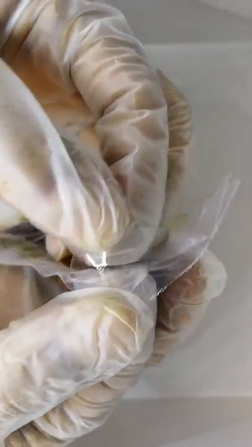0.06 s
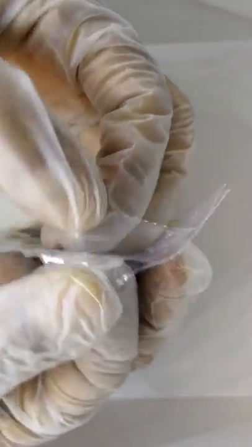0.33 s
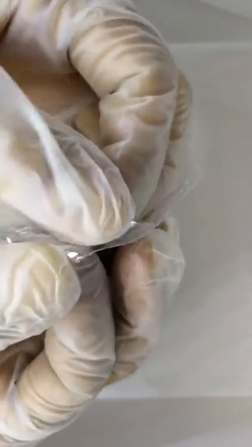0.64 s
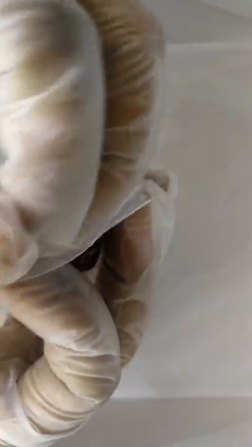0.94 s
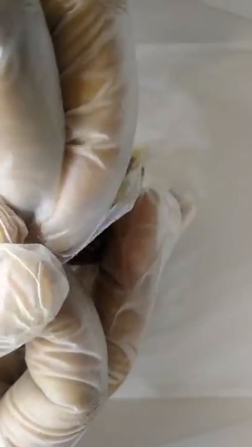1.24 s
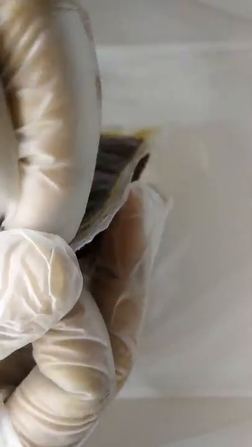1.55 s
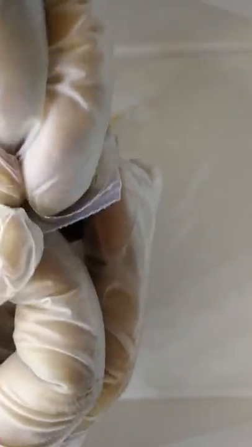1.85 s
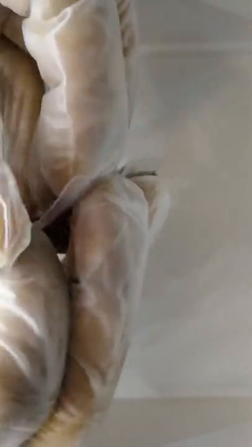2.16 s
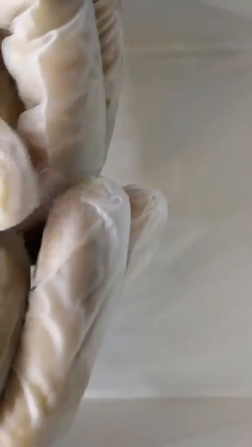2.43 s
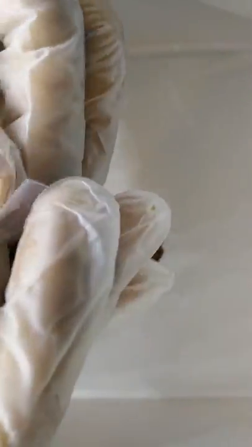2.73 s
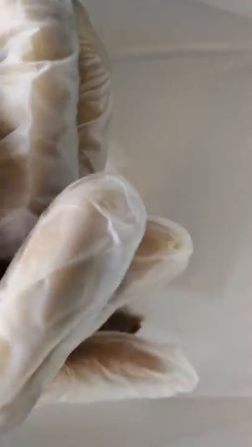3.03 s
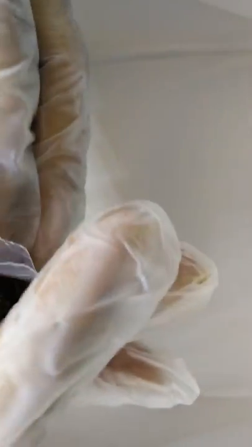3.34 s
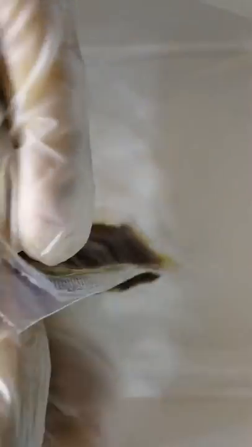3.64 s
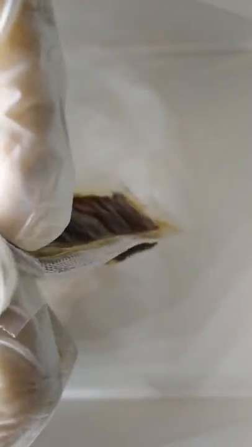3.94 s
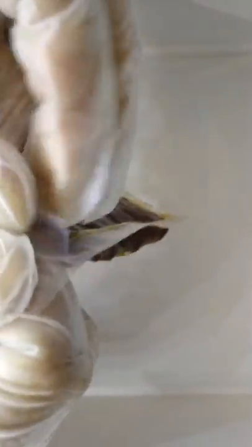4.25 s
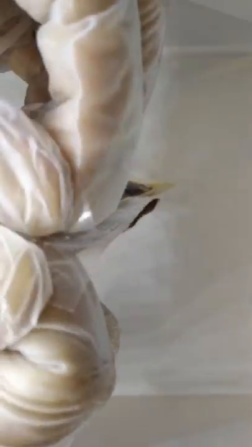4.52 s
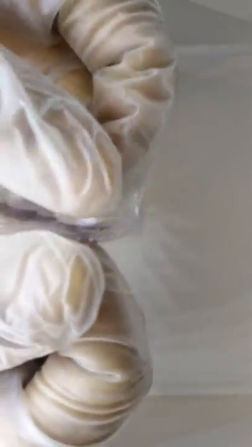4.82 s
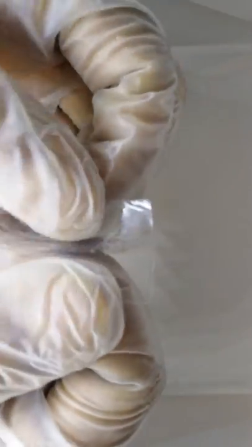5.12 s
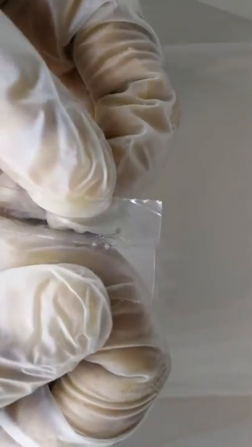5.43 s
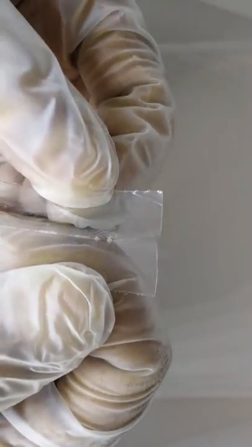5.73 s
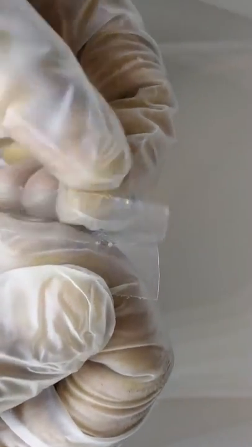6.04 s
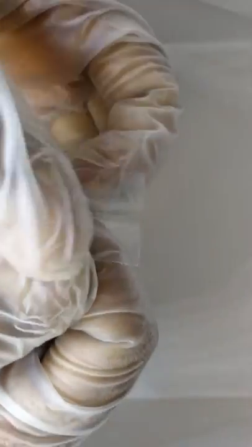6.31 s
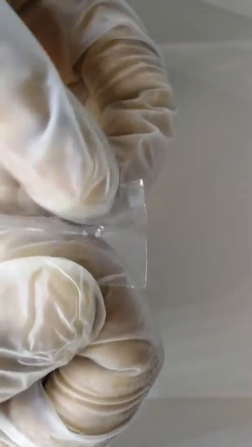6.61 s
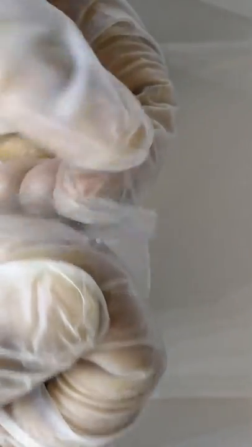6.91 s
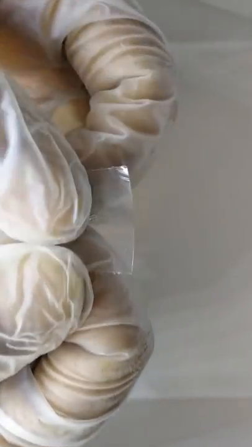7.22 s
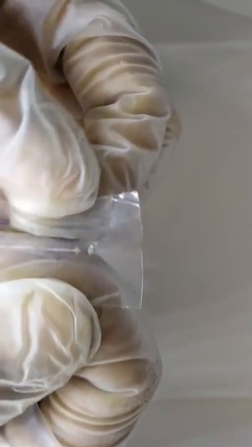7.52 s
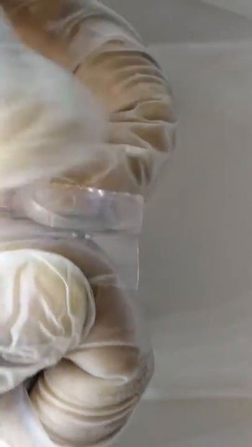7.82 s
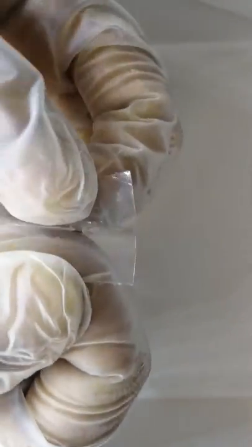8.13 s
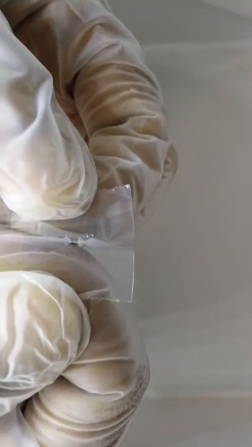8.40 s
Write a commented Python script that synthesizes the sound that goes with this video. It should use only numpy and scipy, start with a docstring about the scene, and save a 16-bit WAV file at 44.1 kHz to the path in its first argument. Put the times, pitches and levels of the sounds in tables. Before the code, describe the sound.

Gloved fingers work a small pack of thin plastic film, close to the microphone and mostly on the left. Two sharp snaps stand out at about 0.1 and 0.7 seconds among short, crisp rustles. Irregular crinkling continues as the gloves drag over the film and creases buckle, with stronger clusters around 2.1, 2.5, 3.3 and 3.7 to 4.3 seconds, and another near 5. The film whispers and ticks faintly between pushes, and soft, dull fingertip bumps come near 0.6, 3.3 and 6.7 seconds. From about 5.2 to 6 seconds the fingers rest. The crinkling then returns, with bursts around 6.4 and 7.2 seconds and a sharp crackle near 7.9, thinning to a few small ticks by 8.5. Behind it all is a quiet room with a soft low rumble and a faint hiss that slowly sinks.

```python
"""Close, crisp crinkling, mostly on the left: gloved fingers work a small pack of thin plastic film.
Each push drags glove over film in a swell of tiny slips; creases buckle with sharp snaps that flutter
through the sheet. The held film whispers between strokes, and a fingertip bumps it dully now and then.
Behind it a quiet room rumbles softly and a faint wash of noise slowly sinks."""
import sys
import numpy as np
from scipy import signal
from scipy.fft import rfft, irfft, next_fast_len
from scipy.io import wavfile

SR = 44100
rng = np.random.default_rng(int(sys.argv[2]) if len(sys.argv) > 2 else 0)


def waveform_to_disk(signal):
    """Save audio, clipped to [-1, 1], as 16-bit WAV at the path in sys.argv[1]."""
    frames = np.transpose(np.atleast_2d(signal))
    scaled = np.clip(frames, -1, 1) * 32767
    samples = np.round(scaled).astype(np.int16)
    wavfile.write(sys.argv[1], SR, samples)


N = 381906

# finger strokes on the film:
# (peak time [s], level [dB], rise [s], fall [s], body [dB], brightness [dB], facet pitch [Hz])
STROKES = [(0.081, -47, 0.051, 0.027, 0, -3, 3200), (0.453, -51, 0.0605, .029, 6.5, -2.5, 7250),
           (.568, -42, 0.0063, 0.0108, -8.5, -3, 5280), (.624, -43.5, 0.0355, 0.0207, -2, 3, 7340),
           (.75, -56, 0.0226, 0.0484, 8, 6.5, 3100), (.893, -51.5, 0.0173, 0.0547, 2, 1.5, 3940),
           (1.005, -47.5, 0.0091, 0.0522, 0.5, -0.5, 4940), (1.166, -47, 0.0333, 0.059, -4, -1.5, 4820),
           (1.227, -38.5, 0.0129, 0.0179, -8, -4.5, 7070), (1.431, -43.5, 0.0172, 0.0227, -4, 2, 4980),
           (1.516, -43, 0.022, 0.0235, -6.5, 0.5, 5320), (1.685, -55, 0.063, 0.0334, 0.5, -4.5, 5050),
           (1.777, -45, 0.0259, 0.0477, -2.5, 2.5, 2859), (2.085, -37, 0.01106, 0.0136, -8.5, -.5, 2760),
           (2.134, -37.5, 0.045, 0.0264, -11, -2, 2916), (2.23, -56, 0.021, 0.022, -10, -8, 5600),
           (2.33, -56.5, 0.0309, 0.0195, -1, -3.5, 1980), (2.48, -50.5, .028, 0.026, 4, -9.5, 2180),
           (2.531, -40.5, 0.0228, 0.0144, 2, 5, 2290), (2.558, -33, 0.00844, 0.00413, 3.5, 7.5, 5430),
           (2.72, -47, 0.019, 0.0134, 1.5, -1, 3310), (2.805, -52.5, 0.0197, 0.014, 5, 3.5, 5940),
           (3.035, -47.5, .055, .035, 2, -2.5, 4700), (3.14, -42.5, .026, 0.0667, -5.5, 0, 2087),
           (3.293, -38, 0.0207, 0.0116, -4.5, -1, 6574), (3.312, -32, 0.00566, 0.00154, -5.5, 7.5, 3070),
           (3.325, -41.5, 0.01435, 0.0146, 6, -3, 9000), (3.614, -46.5, 0.044, 0.061, 2.5, 0, 5380),
           (3.699, -35.5, 0.0158, 0.013, 3.5, 3.5, 4878), (3.757, -37.5, 0.0263, 0.0296, -2, 4.5, 5880),
           (3.918, -41.5, 0.0323, 0.0295, -7.5, 0.5, 7534), (3.977, -38, 0.00803, 0.0123, -3.5, 2.5, 7440),
           (4.254, -43.5, 0.0302, 0.042, 2, -0.5, 8460), (4.324, -45.5, 0.0221, 0.0335, -1.5, -2.5, 3300),
           (4.496, -54, 0.0133, 0.0141, 6, 2, 5530), (4.865, -50, 0.01304, 0.0136, -1, -4, 2020),
           (4.935, -58.5, 0.0108, 0.0128, 15, -3.5, 2890), (4.984, -33, 0.00702, 0.0063, -0.5, -0.5, 4480),
           (5.025, -42.5, .028, 0.024, -4, -1.5, 4700), (5.072, -47.5, 0.0098, 0.0068, -3, -12, 4740),
           (6.036, -40.5, 0.0091, 0.0124, 0, 1.5, 1980), (6.116, -53.5, 0.0547, 0.0188, -1.5, -1.5, 4870),
           (6.186, -54, 0.0194, 0.0197, 6.5, 0, 2790), (6.26, -52, 0.0272, 0.018, -2, -2, 3430),
           (6.332, -36.5, 0.01527, 0.0117, -0.5, 0, 3980),
           (6.389, -34.5, 0.01338, 0.03325, -1.5, 2.5, 4000), (6.675, -48, 0.061, 0.06, 1, 1.5, 6420),
           (6.723, -41.5, 0.0152, 0.0074, 3, 3, 5530), (6.92, -56.5, .025, 0.042, -2, -4, 3500),
           (7.017, -53.5, 0.0156, 0.0175, 2, -3, 3530), (7.154, -41, 0.0126, 0.00304, -0.5, 7, 4157),
           (7.191, -37.5, 0.0141, 0.0329, -2.5, 4.5, 3945), (7.467, -61.5, 0.0844, 0.069, 2.5, 3.5, 2360),
           (7.585, -56, 0.038, 0.009, 9.5, 4, 8300), (7.605, -41.5, 0.00683, 0.0074, -0.5, -2, 8300),
           (7.811, -46.5, 0.0182, 0.0062, -13, -0.5, 8510), (7.859, -55.5, 0.061, 0.0406, 8, 2, 5850),
           (7.936, -29.5, 0.00506, 0.00384, -1, -1, 4096), (7.953, -42, 0.0102, 0.0252, 3.5, 1, 5610),
           (8.252, -48.5, 0.00425, 0.0187, 3.5, -6.5, 4900)]


def from_db(db):
    return 10 ** (np.asarray(db) / 20)


def unit_rms(x):
    return x / np.sqrt(np.mean(x ** 2) + 1e-20)


def unit_energy(x):
    return x / np.sqrt(np.sum(x ** 2) + 1e-20)


def at_hz(points, hz):
    """Reads a curve of (frequency [Hz], value) points along a log frequency axis."""
    points_hz, values = np.array(points).T
    return np.interp(np.log(hz + 1), np.log(points_hz), values)


def add(out, time, sound):
    """Lays a sound into the track from a time in seconds."""
    start = round(time * SR)
    first, last = max(start, 0), min(start + len(sound), N)
    if last > first:
        out[first:last] += sound[first - start:last - start]


def equalise(x, db_at):
    """Minimum-phase EQ along a gain curve in dB: nothing rings ahead of an attack."""
    size = 2 * next_fast_len(x.shape[-1] // 2 + 256)
    cepstrum = irfft(np.log(from_db(db_at(np.fft.rfftfreq(size, 1 / SR)))))
    cepstrum[1:size // 2] *= 2
    cepstrum[size // 2 + 1:] = 0
    return irfft(rfft(x, size) * np.exp(rfft(cepstrum)))[..., :x.shape[-1]]


def room_noise(colour, channels, ripple_db=3.5):
    """Steady noise of a given colour, rippled by the standing waves of the room."""
    size = next_fast_len(N, True)
    hz = np.fft.rfftfreq(size, 1 / SR)
    waves_hz = np.geomspace(300, 4000, 130)
    ripple = ripple_db * np.interp(hz, waves_hz, rng.standard_normal(len(waves_hz)), left=0, right=0)
    gain = from_db(at_hz(colour, hz) + ripple)
    white = rng.standard_normal((channels, size))
    return unit_rms(irfft(rfft(white) * gain, size)[:, :N])


def room_tone(rumble_db=-62, air_db=-64, wash_start_db=-60, sink_db_per_s=1.5, wash_right_db=4):
    """A bed of centred rumble, wide airy hiss and a distant, sinking wash that leans right."""
    # spectra of the three layers: (frequency [Hz], relative level [dB])
    rumble_colour = [(15, -11.5), (28, -1), (45, -15.5), (60, 1), (80, -12), (118, 4), (140, -4),
                     (200, -0.5), (285, -1.5), (380, -21), (600, -40), (1100, -21), (1500, -38),
                     (4000, -49)]
    air_colour = [(30, -30), (120, -18), (210, -12.5), (295, -5.5), (380, -10), (560, -13), (760, -8.5),
                  (900, -15), (1200, -10), (1400, -19), (2000, -20), (2600, -22.5), (7000, -26),
                  (11000, -28.5), (15500, -29)]
    wash_colour = [(300, -17), (620, -10), (770, 0), (1050, 3.5), (1400, -5.5), (1850, -2), (2600, -14),
                   (5000, -21), (12000, -38.5)]
    rumble = from_db(rumble_db) * room_noise(rumble_colour, channels=1)
    air = from_db(air_db) * room_noise(air_colour, channels=2)
    fade = from_db(wash_start_db - sink_db_per_s * np.arange(N) / SR)
    pan = from_db([[-wash_right_db / 2], [wash_right_db / 2]])
    wash = fade * pan * room_noise(wash_colour, channels=2)
    return rumble + air + wash


def slips(length, per_s, spread_db):
    """Tiny slips click at random moments: many small, a few large."""
    sizes = from_db(spread_db * np.minimum(rng.exponential(1, length), 4))
    signs = rng.choice([-1, 1], length)
    return sizes * signs * (rng.random(length) < per_s / SR)


def film(force, body_db, bright_db, facet_hz, facet_db, grip_db, facet_width=0.0564):
    """The sheet's voice: slack film adds body, taut film brightness; the touched facet rings."""
    # what the film radiates: (frequency [Hz], gain [dB])
    film_colour = [(400, -38), (1100, -30), (1800, -14.5), (3400, -13.5), (4100, -4.5), (5300, -6.5),
                   (6700, -3.5), (7400, -8), (9100, -10.5), (10800, -17.5), (12300, -26.5), (15500, -27.5)]
    # resonances of the pack in the hand: (frequency [Hz], width [Hz], lift [dB])
    pack_modes = [(2216.5, 190, 5.5), (2853, 193, 7), (3159.6, 80, 6.5), (4100, 110, -0.5), (4752, 578, 6),
                  (5616, 154, 3), (6378, 1190, 3), (8070, 280, 2.5), (8910, 232, 5.5)]
    peaks = [*pack_modes, (facet_hz, facet_width * facet_hz, facet_db)]
    ripple_hz = np.geomspace(1000, 16000, 110)
    ripple = grip_db * rng.standard_normal(len(ripple_hz))   # each grip shifts the small resonances

    def db_at(hz):
        modes = sum(lift / (1 + (2 * (hz - centre) / width) ** 2) for centre, width, lift in peaks)
        body = body_db * at_hz([(3000, 1), (4600, 0)], hz)
        bright = bright_db * at_hz([(6500, 0), (9500, 1)], hz)
        return at_hz(film_colour, hz) + modes + body + bright + np.interp(hz, ripple_hz, ripple)
    return equalise(force, db_at)


def creeping(ticks_per_s=90, tick_gain=0.68, fade_s=0.426, rest_db=-73, settle_db=-20, settle_s=0.0806):
    """The held film whispers and ticks faintly, most while it settles after a push."""
    # spells of fingers creeping over the film: (start [s], end [s], level [dB])
    holds = [(0, 5.2, -64), (6.1, 8.2, -67.5)]
    force = rng.standard_normal(N) + tick_gain * unit_rms(slips(N, ticks_per_s, spread_db=3.5))
    whisper = film(force, body_db=4.5, bright_db=0.5, facet_hz=4700, facet_db=-0.5, grip_db=2)
    t = np.arange(N) / SR
    held = sum(from_db(level_db) * np.clip(1 + np.minimum(t - start, end - t) / fade_s, 0, 1)
               for start, end, level_db in holds)
    held_power = np.maximum(held, from_db(rest_db)) ** 2   # a trace remains while the fingers rest
    pushes = np.zeros(N)
    for time, level_db, *_ in STROKES:
        add(pushes, time, [from_db(level_db + settle_db) ** 2])
    settling_power = signal.lfilter([1], [1, -np.exp(-2 / (settle_s * SR))], pushes)
    return np.sqrt(held_power + settling_power) * unit_rms(whisper)


def rubbing(slips_per_s=12000, crackles_per_s=170, crackle_gain=0.39, judder_db=1.86):
    """Each stroke swells with dense micro-slips and a few crackles as the glove grips and lets go."""
    pinch_db, slide_db, blur_s = 11, 6, 0.0473   # the facet rings in a short pinch, less in a long slide
    out = np.zeros(N)
    for time, level_db, rise, fall, *tone in STROKES:
        t = np.arange(-3 * rise, 3 * fall, 1 / SR)
        swell = np.exp(-.5 * (t / np.where(t < 0, rise, fall)) ** 2)
        grip_times = np.arange(t[0], t[-1], .005)
        judder = from_db(judder_db * np.interp(t, grip_times, rng.standard_normal(len(grip_times))))
        friction = unit_rms(slips(len(t), slips_per_s, spread_db=2))
        crackle = crackle_gain * unit_rms(slips(len(t), crackles_per_s, spread_db=2))
        facet_db = slide_db + (pinch_db - slide_db) * np.exp(-(rise + fall) / blur_s)
        rub = film((friction + crackle) * judder * swell, *tone, facet_db, grip_db=3)
        add(out, time + t[0], from_db(level_db) * unit_energy(rub) * np.linalg.norm(swell))
    return out


def small_creases(per_s=20, chances=6, over_stroke_db=19.5, spread_db=3, facet_db=11):
    """Cues for creases that give way by chance under a moving finger, louder the harder it pushes."""
    cues = []
    for peak_time, level_db, rise, fall, body_db, bright_db, facet_hz in STROKES:
        odds = per_s * 2 * (rise + fall) / chances
        for luck, (when, softness, detune) in zip(rng.random(chances), rng.standard_normal((chances, 3))):
            if luck < odds:
                time = peak_time + when * (rise if when < 0 else fall)
                push_db = level_db + 20 * np.log10(np.exp(-.5 * when ** 2))
                energy_db = push_db + over_stroke_db - spread_db * softness
                cues.append((time, energy_db, body_db - 1, bright_db, facet_hz * 2 ** (detune / 2), facet_db))
    return cues


def snapping(rebound=0.483, flutter=0.88, flutter_t60=0.01955):
    """A crease flips and rebounds, and the wave scatters to and fro across the sheet."""
    # creases that stand out as they buckle:
    # (time [s], energy [dB], body [dB], brightness [dB], facet pitch [Hz], facet lift [dB])
    creases = [(0.085, -7, 0.5, -4, 6960, 12.5), (0.1036, 5.5, -1, .5, 3950, 8.5),
               (0.3982, -18.5, 6, -4, 4800, 12), (0.4253, -14.5, -1.5, 1.5, 7170, 14.5),
               (0.5577, -4.5, 7, -3.5, 10400, 10), (0.6686, -15.5, 13, -1.5, 4500, 10.5),
               (.6821, 6, 2, 0, 7560, 4.5), (.716, -21.5, 6, 8, 5080, 12), (0.8912, -19, -2, 9, 3910, 13),
               (1.0234, -15.5, -19, -1, 8100, 8.5), (1.2186, -14.5, -3.5, -6.5, 8900, 5.5),
               (2.4933, -9.5, 8.5, 13.5, 6550, 8.5), (2.5302, -10, 1, 5.5, 2674, 8),
               (2.7936, -23, 0.5, -0.5, 5990, 17), (2.811, -19.5, -5.5, 6.5, 8020, 7),
               (2.911, -25.5, 1.5, 3.5, 6990, 0), (3.2118, -19.5, 10, 6, 8700, 10.5),
               (3.3834, -12.5, 14, 23.5, 6320, 17.5), (3.7258, -10, 1, -0.5, 5820, 11.5),
               (3.806, -16, -2, -8, 6200, 3.5), (4.043, -17.5, -4.5, -7, 7780, 8),
               (4.2032, -23.5, 5, -13, 5770, 11), (4.4417, -22.5, 2.5, -7, 3884, 3.5),
               (6.021, -13, 1, -5.5, 1980, 15.5), (6.058, -19, 2, -2.5, 4937, 4),
               (7.8392, -18.5, 4, 2, 5850, 6.5), (8.2444, -17, 0.5, -16, 8840, 3),
               (8.5004, -32, 13.5, 2, 2090, 11)]
    out, t = np.zeros(N), np.arange(SR // 25) / SR
    for time, energy_db, *tone in creases + small_creases():
        # the sheet scatters all pitches alike: a flat spectrum with random phases
        scatter = irfft(np.exp(2j * np.pi * rng.random(len(t) // 2 + 1)), len(t))
        force = flutter * unit_energy(scatter * from_db(-60 * t / flutter_t60) * (t > .0003))
        force[0] += 1   # the flip
        force[round(rng.uniform(.0004, .0006) * SR)] -= rebound
        snap = film(force, *tone, grip_db=1.14, facet_width=0.187)
        add(out, time, from_db(energy_db) * unit_energy(snap))
    return out


def nudging(band_hz=(260, 1000), decay_s=0.0089):
    """A soft fingertip bumps the pack: a short, dull puff."""
    # fingertip bumps: (time [s], level [dB])
    nudges = [(.558, -48), (3.306, -45), (3.324, -51.5), (3.334, -52), (6.73, -53)]
    out, t = np.zeros(N), np.arange(SR // 10) / SR
    dull = signal.butter(2, band_hz, "band", fs=SR, output="sos")
    for time, level_db in nudges:
        puff = unit_rms(signal.sosfilt(dull, rng.standard_normal(len(t))))
        add(out, time, from_db(level_db) * puff * np.exp(-t / decay_s))
    return out


def far_microphone(x, lag_samples=23, scatter=0.64, scatter_t60=0.0324):
    """The right microphone lies in shadow: sound comes late, weak and partly by way of the hands."""
    # shadow on the far side: (frequency [Hz], gain [dB])
    shadow = [(500, -2), (1200, -13.5), (2200, -12.5), (4500, -20.5), (7000, -33.5), (10000, -20),
              (15000, -22)]
    t = np.arange(SR // 40) / SR
    decay = from_db(-60 * t / scatter_t60) * (t > lag_samples / SR)
    path = scatter * unit_energy(rng.standard_normal(len(t)) * decay)
    path[lag_samples] += 1   # the direct arrival
    shaded_path = equalise(unit_energy(path), lambda hz: at_hz(shadow, hz))
    return signal.oaconvolve(x, shaded_path)[:N]


def room_reverb(x, wet_db=-29.5, t60=0.265, damping_hz=7000):
    """A faint diffuse tail from the walls, different on each side."""
    t = np.arange(SR // 2) / SR
    tail = rng.standard_normal((2, len(t))) * from_db(-60 * t / t60) * (t > .004)
    tail = signal.sosfilt(signal.butter(1, damping_hz, fs=SR, output="sos"), tail)
    return from_db(wet_db) * np.array([signal.oaconvolve(x, unit_energy(side))[:N] for side in tail])


def scene():
    """The pack, close on the left and shadowed on the right, in its room."""
    pack = rubbing() + creeping() + snapping() + nudging()
    return np.array([pack, far_microphone(pack)]) + room_reverb(pack) + room_tone()


def record(dry):
    """A steep low-pass trims the very top."""
    cutoff_hz = 15900
    return signal.sosfilt(signal.ellip(10, .1, 70, cutoff_hz, fs=SR, output="sos"), dry)


dry = scene()
out = record(dry)
waveform_to_disk(out)
```